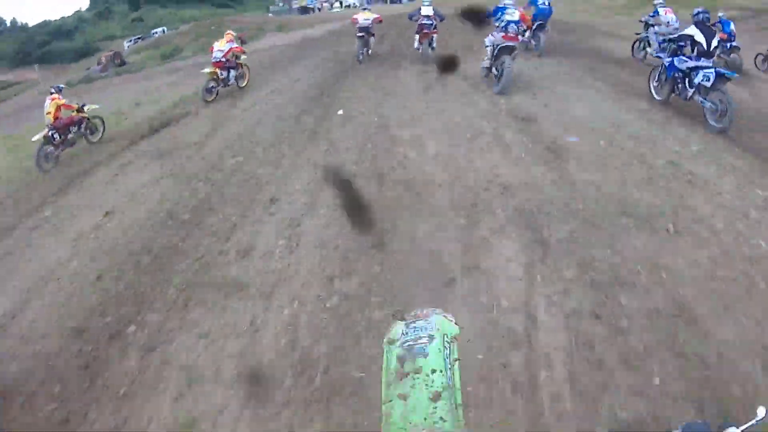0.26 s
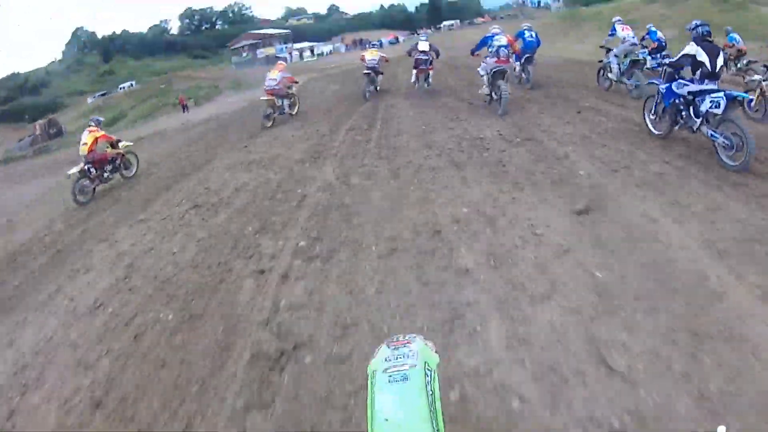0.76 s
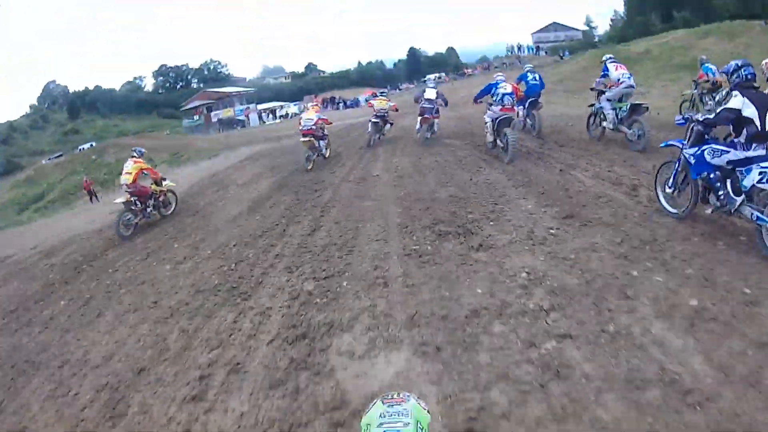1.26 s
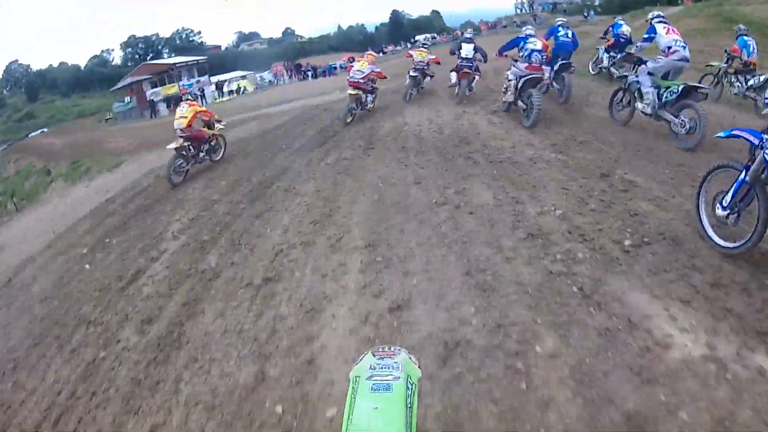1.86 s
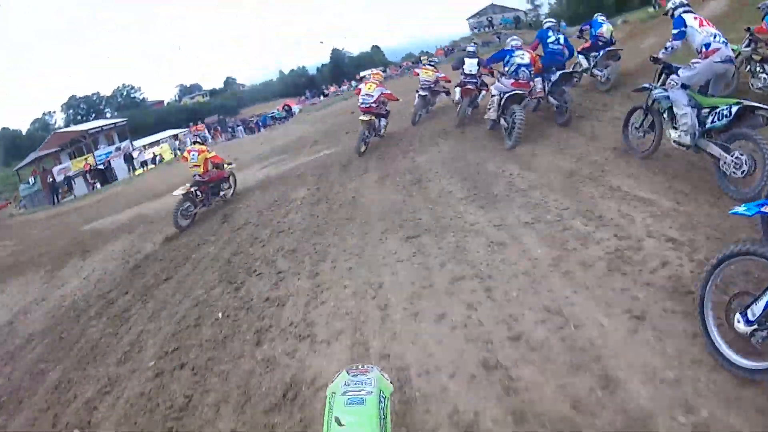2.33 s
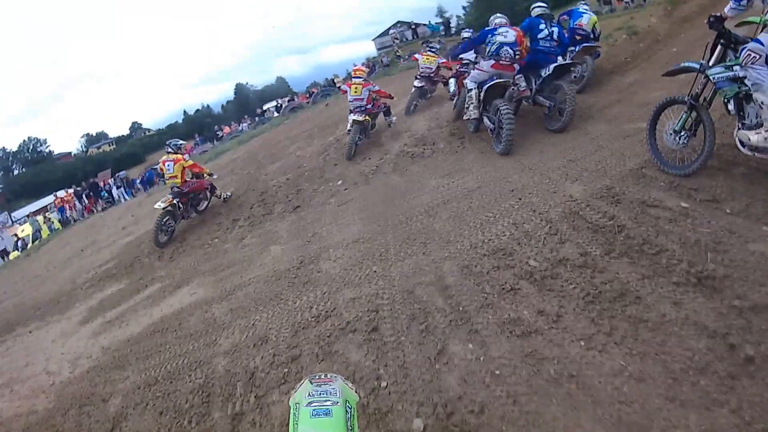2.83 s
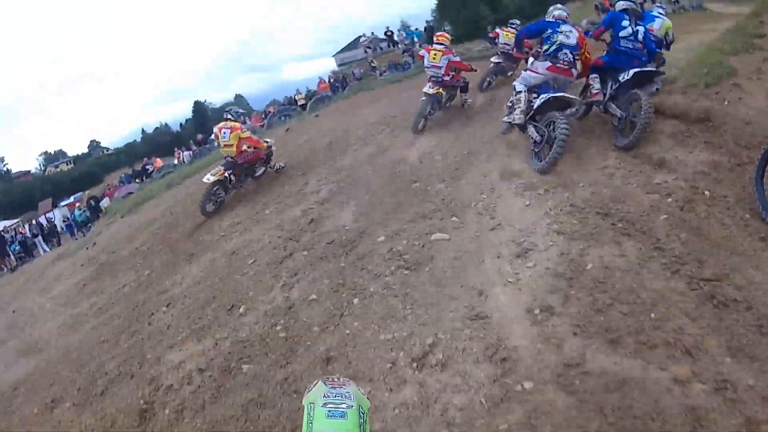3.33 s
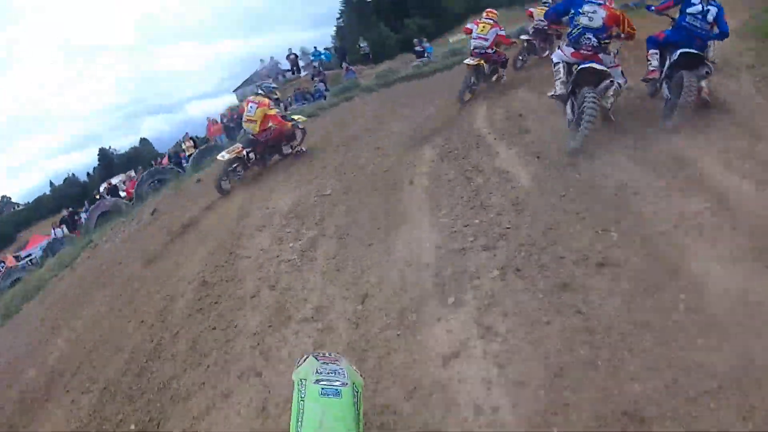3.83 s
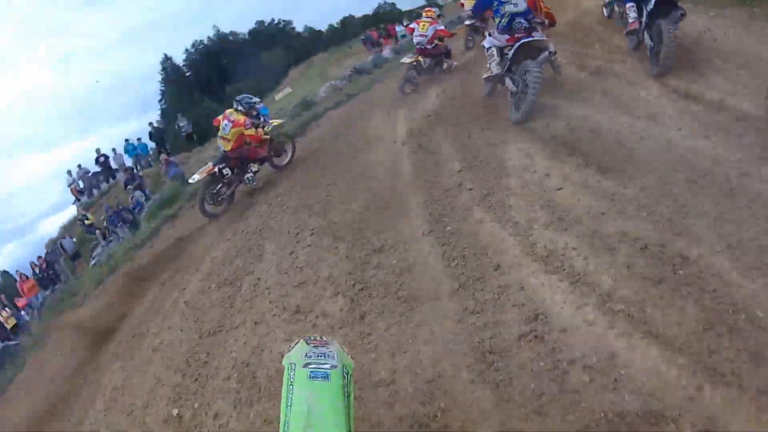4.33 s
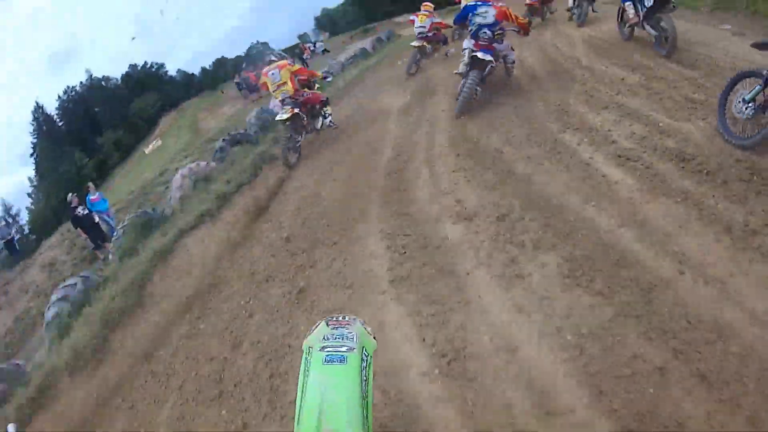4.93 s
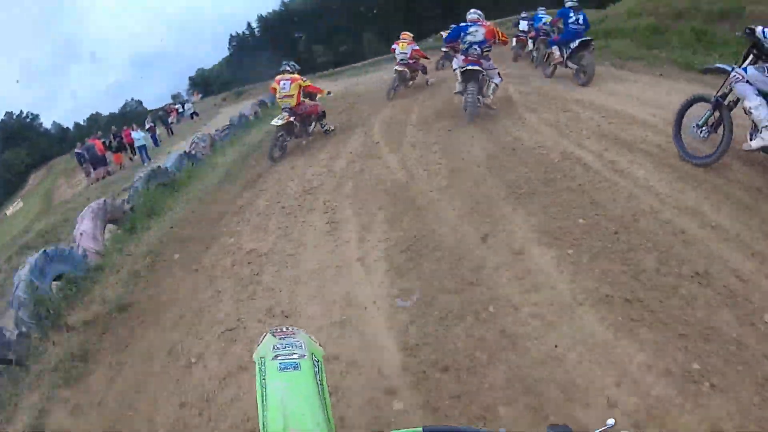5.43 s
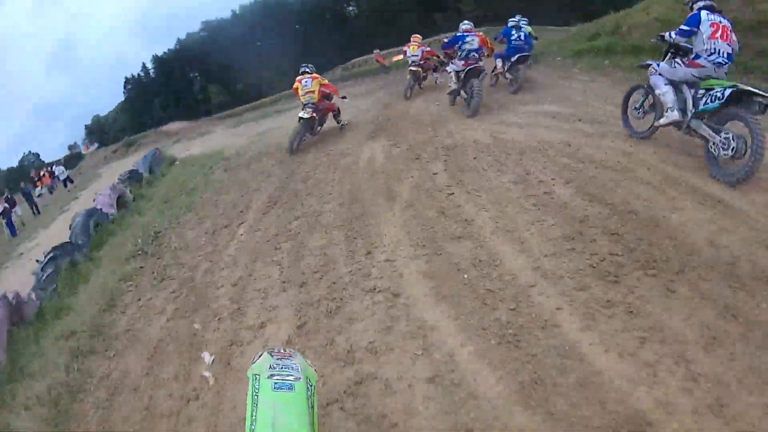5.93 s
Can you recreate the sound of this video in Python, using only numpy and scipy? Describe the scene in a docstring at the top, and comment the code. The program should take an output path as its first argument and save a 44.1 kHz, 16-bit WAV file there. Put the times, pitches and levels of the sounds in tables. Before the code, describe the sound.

A dirt bike engine barks briefly as a shower of dirt pelts the microphone's plastic case. A pack of bikes buzzes further ahead, with short revs and scattered sharp knocks from stones and chain. Nearby engines then rev louder through a corner, and the closest bike rasps back on the throttle amid pattering grit and hard clacks. Everything sounds boxy, nasal and slightly overloaded.

```python
"""Motocross corner from inside a camera case.

A pack of bikes brakes into a dirt corner and accelerates out, heard on one rider. Thrown dirt pelts the
case, stones and chain knock, rivals rev close by, and the rider's own engine barks out of the turn.
The plastic case passes mostly 1-3.5 kHz; loud moments overload the microphone."""
import sys
import numpy as np
from scipy import signal
from scipy.fft import rfft, irfft, next_fast_len
from scipy.io import wavfile
from scipy.ndimage import uniform_filter1d, minimum_filter1d

SR = 44100
rng = np.random.default_rng(int(sys.argv[2]) if len(sys.argv) > 2 else 0)


def wav_record(signal):
    """Record a signal, one row per channel, as 16-bit PCM in the file named by sys.argv[1]."""
    frames = np.transpose(np.atleast_2d(signal))
    bounded = np.clip(frames, -1, 1)
    # unit amplitude maps onto the largest positive 16-bit level
    quanta = np.round(bounded * 32767).astype(np.int16)
    wavfile.write(sys.argv[1], SR, quanta)


N = 272979
TIME = np.arange(N) / SR

# the field draws away on the straight, bunches up in the corner: time_s, level_db
PACK_LEVEL = [(0, -10), (.36, -16.5), (.45, -21.5), (.8, -25), (1.45, -27.5), (1.66, -25), (2.1, -25),
              (2.75, -28.5), (3.17, -24), (3.26, -21), (3.46, -21), (3.62, -17.5), (4.28, -15.5),
              (5.0, -13.5), (5.8, -17.5), (6.19, -20.5)]


def from_db(db):
    """Decibels to gain."""
    return 10 ** (np.asarray(db) / 20)


def unit_rms(x):
    """Scale to rms 1."""
    return x / np.sqrt(np.mean(x ** 2) + 1e-20)


def curves(rows, t=TIME):
    """Breakpoint columns interpolated at times t."""
    time_s, *columns = np.transpose(rows)
    return [np.interp(t, time_s, column) for column in columns]


def drift(rate_hz, size=N, hop=40):
    """Slow random wander, rms about 1."""
    pole = np.exp(-2 * np.pi * rate_hz * hop / SR)
    noise = rng.standard_normal(size // hop + 4000)
    slow = signal.lfilter([1], [1, -2 * pole, pole * pole], noise)[2000:]
    return np.interp(np.arange(size) / hop, np.arange(len(slow)), unit_rms(slow))


def swell(start_s, end_s, attack_s, release_s):
    """Rise to 1 by start_s, hold, decay after end_s."""
    rise = np.clip(1 + (TIME - start_s) / attack_s, 0, 1)
    return rise * np.exp(-np.clip((TIME - end_s) / release_s, 0, 20))


def window(start_s, end_s, fade_s=.032):
    """Sample mask of a burst and its gain, with fades outside the span."""
    inside_s = np.minimum(TIME - start_s, end_s - TIME)
    on = inside_s > -fade_s
    return on, np.clip(1 + inside_s[on] / fade_s, 0, 1)


def response(points, size=2048):
    """Minimum-phase impulse response from rows of freq_hz, gain_db."""
    fft_size = 2 * next_fast_len(N // 2 + 8192)
    bins_hz = np.maximum(np.arange(fft_size // 2 + 1) * SR / fft_size, 1)
    freq_hz, gain_db = np.transpose(points)
    magnitude = from_db(np.interp(np.log(bins_hz), np.log(freq_hz), gain_db))
    cepstrum = irfft(np.log(magnitude))
    cepstrum[0] /= 2
    return irfft(np.exp(2 * rfft(cepstrum[:size], fft_size)))[:size]


def through(x, impulse):
    """Filter by an impulse response."""
    return signal.oaconvolve(x, impulse)[:len(x)]


def resonance(x, hz, width_hz, gain_db):
    """Lift or cut a band with a two-pole resonator."""
    r = np.exp(-np.pi * width_hz / SR)
    ring = signal.lfilter([1, 0, -1], [1, -2 * r * np.cos(2 * np.pi * hz / SR), r * r], x + 1e-18)
    return x + (from_db(gain_db) - 1) * (1 - r * r) / 2 * ring


def camera_case():
    """Impulse response of the plastic case."""
    # wall transmission: freq_hz, gain_db
    wall = [(30, -25.5), (150, -31), (400, -19.5), (900, -18), (1050, -7.5), (1250, -1), (2100, 0.5),
            (2560, -10), (2900, 0.5), (3400, -4), (4000, -9), (5200, -26), (7000, -11.5), (16000, -46)]
    # panel modes: freq_hz, width_hz, gain_db
    modes = [(832, 85, 4.5), (1369, 100, 6), (1579, 73, 5.5), (1898, 284, 3.5), (2365, 74, 6.5),
             (2804, 270, 3), (3254, 46, 2), (4260, 24, -11), (4490, 82, 5.5), (4900, 31, -4),
             (5070, 56, 13.5), (5490, 59, 12.5)]
    impulse = response(wall)
    for freq_hz, width_hz, gain_db in modes:
        impulse = resonance(impulse, freq_hz, width_hz, gain_db)
    return impulse


def engine(firing_hz, rasp, uneven_db, wobble=.002, blow_s=.004, bark_hz=0, bark_s=.003, bark=0):
    """Firings of uneven strength: exhaust pulse, dying blow of gas noise, optional pipe ring (bark)."""
    size = len(firing_hz)
    cycles = rng.random() + np.cumsum(firing_hz * (1 + wobble * drift(24.4, size))) / SR
    nearest, last = np.round(cycles).astype(int), cycles.astype(int)
    age_s = cycles % 1 / firing_hz
    strength = from_db(uneven_db * rng.standard_normal(nearest[-1] + 2))
    pulses = np.sinc((cycles - nearest) * SR / firing_hz) * strength[nearest]
    blow = np.exp(-age_s / blow_s) * strength[last] * rng.standard_normal(size)
    ring = np.exp(-age_s / bark_s) * strength[last] * np.sin(2 * np.pi * bark_hz * age_s)
    return np.sqrt(1 - rasp) * unit_rms(pulses) + np.sqrt(rasp) * unit_rms(blow) + bark * unit_rms(ring)


def own_bike(case, attack_s=.042, climb_hz_per_s=380):
    """Slow, hard firings; the bark climbs while the throttle is held."""
    # revs sag under load, flare as the rear wheel slips: time_s, firing_hz
    revs = [(4.9, 70.5), (5.42, 66.6), (5.56, 77.3), (5.74, 69.4), (5.86, 68)]
    # throttle openings: start_s, end_s, level_db
    throttle = [(0, 0.32, -11), (4.34, 4.753, -19), (4.9, 5.833, -12)]
    firing_hz, = curves(revs)
    gain, held_s = np.zeros(N), np.zeros(N)
    for start_s, end_s, level_db in throttle:
        gain += from_db(level_db) * swell(start_s, end_s, attack_s, release_s=.014)
        held_s = np.where(TIME > start_s - attack_s, np.clip(TIME, start_s, end_s) - start_s, held_s)
    bark_hz = 1585 + climb_hz_per_s * held_s
    exhaust = engine(firing_hz, rasp=.55, uneven_db=2, wobble=.001,
                     bark_hz=bark_hz, bark_s=.0011, bark=.65)
    ground_echo = .13 * np.interp(TIME - .0037, TIME, exhaust)
    return gain * unit_rms(through(exhaust + ground_echo, case))


def pack(case, scatter_s=.012, size=2048):
    """Far engines rev independently; ground and banks scatter their firings into a smooth buzz."""
    # mean rate of each engine: firing_hz
    engines_hz = [78.46, 92.84, 117.74, 134.65, 143.46, 156.26, 171.6]
    out = np.zeros(N)
    for firing_hz in engines_hz:
        revs = drift(.5)
        buzz = engine(firing_hz * np.exp(.07 * revs), rasp=.15, uneven_db=1.6)
        echoes = rfft(rng.standard_normal(size) * np.exp(-TIME[:size] / scatter_s))
        scatter = irfft(echoes / np.abs(echoes))   # flat spectrum, smeared in time
        out += through(buzz, scatter) * from_db(revs + 2 * drift(1.56))
    return from_db(curves(PACK_LEVEL)[0]) * unit_rms(through(out, case))


def struck_panel(case, ring_hz, width_hz, ring_db):
    """Case response to a blow that favours one panel; unit energy."""
    body = resonance(case, ring_hz, width_hz, ring_db)
    return body / np.linalg.norm(body)


def clods(case, panels_hz=(1380, 1650, 2000, 3200), crumble_s=.0041, size=1024):
    """Clods land at random on the case panels and crumble within milliseconds."""
    # showers from the bikes ahead: start_s, end_s, hits_per_s, size_db
    showers = [(0, 0.099, 380, -3.5), (0.125, 0.224, 460, -4), (0.271, 0.363, 300, -7),
               (4.398, 5.804, 55, -15.5)]
    rate_per_s, weight = 55, from_db(-32)   # stray clods throughout
    for start_s, end_s, hits_per_s, size_db in showers:
        shower = swell(start_s, end_s, attack_s=.057, release_s=.012)
        rate_per_s += hits_per_s * shower
        weight += from_db(size_db) * shower
    out = np.zeros(N)
    for panel_hz in panels_hz:
        lands = rng.random(N) < rate_per_s / len(panels_hz) / SR
        hits = lands * weight * from_db(5.45 * rng.standard_normal(N))
        crumbs = through(hits, np.exp(-TIME[:size] / crumble_s)) * rng.standard_normal(N)
        out += through(crumbs, struck_panel(case, panel_hz, width_hz=124, ring_db=10))
    return out


def spray(grains_per_s=5000, band_hz=(6500, 12500)):
    """Fine dirt off the tyres patters on the case as a thin hiss."""
    # gusts of dirt: start_s, end_s, level_db
    gusts = [(0, 0.333, -13.5), (.4, .45, -42), (.68, .71, -41), (1.64, 1.68, -49), (2.058, 2.18, -43),
             (3.22, 3.42, -40), (3.62, 3.72, -40), (4.566, 5.08, -32), (5.216, 5.62, -42),
             (5.72, 6.086, -35.5)]
    grains = (rng.random(N) < grains_per_s / SR) * rng.standard_normal(N)
    hiss = signal.sosfilt(signal.butter(2, band_hz, "band", fs=SR, output="sos"), grains)
    gust_gain = sum(from_db(level_db) * swell(start_s, end_s, attack_s=.075, release_s=.03)
                    for start_s, end_s, level_db in gusts)
    dust_gain = from_db(curves(PACK_LEVEL)[0] - 27.5)   # thin dust trails the field
    return np.hypot(gust_gain, dust_gain) * from_db(1.8 * drift(13)) * unit_rms(hiss)


def knocks(case, thump_hz=450, thump_s=.004, tick_hz=5000, tick_s=.003, size=4096):
    """Each knock: a crack that rings the case, a dull thump through the mount, a bright tick."""
    # stones, chain, suspension: start_s, level_db, ring_hz, decay_s, thump_db
    blows = [(.422, 3.5, 2520, 0.0015, -32), (.64, -5.5, 2280, 0.0019, -60),
             (1.147, -11.5, 640, 0.0087, -28), (1.85, 1, 1910, 0.0038, -52),
             (2.217, 7.5, 2410, 0.0015, -25), (2.582, -16.5, 1600, .006, -60),
             (2.88, -16.5, 1760, .006, -60), (3.472, -11.5, 1420, 0.013, -60),
             (4.01, -1.5, 1630, 0.0031, -27), (4.171, -3, 1600, 0.0028, -29),
             (4.312, -2.5, 1870, 0.0051, -51), (4.424, 1, 1430, 0.012, -20), (4.83, -6, 2080, 0.0043, -45),
             (5.695, 2.5, 2210, 0.0043, -36), (5.739, 8, 1980, 0.0067, -43)]
    out, t = np.zeros(N + size), TIME[:size]
    for start_s, level_db, ring_hz, decay_s, thump_db in blows + rebounds():
        tick_db = -30 + 2.9 * level_db   # harder knocks are brighter
        grit, shake = rng.standard_normal((2, size))
        panel = struck_panel(case, ring_hz, width_hz=310, ring_db=10.5)
        crack = through(grit * np.exp(-t / decay_s), panel)
        thump = unit_rms(signal.lfilter(*signal.butter(1, thump_hz, fs=SR), shake)) * np.exp(-t / thump_s)
        tick = signal.lfilter(*signal.butter(2, tick_hz, "high", fs=SR), shake) * np.exp(-t / tick_s)
        at = round(start_s * SR)
        out[at:at + size] += from_db(level_db) * crack + from_db(thump_db) * thump + from_db(tick_db) * tick
    return out[:N]


def exhaust_pipe(x, hz=2000, pole=.787, stages=6):
    """A long pipe delays the mids and stretches each pulse: an all-pass chain."""
    poles = [1, -2 * pole * np.cos(2 * np.pi * hz / SR), pole ** 2]
    return signal.sosfilt([poles[::-1] + poles] * stages, x)


def rival_exhaust(case, firing_hz, ring_hz, ring_db, octave_db, width_hz=170):
    """A near engine through a tuned pipe ringing at ring_hz and its octave; rms 1."""
    buzz = exhaust_pipe(engine(firing_hz, rasp=.1, uneven_db=1.2, blow_s=.003))
    buzz = resonance(buzz, ring_hz, width_hz, ring_db)
    buzz = resonance(buzz, 2 * ring_hz, 2 * width_hz, octave_db)
    return unit_rms(through(buzz, case))


def rivals(case):
    """Near bikes stand out while their throttle is open; revs glide along an arch."""
    # throttle bursts: start_s, end_s, first_firing_hz, last_firing_hz, flare_hz, level_db, ring_hz, ring_db
    bursts = [(.45, 1.05, 126, 101, 11, -30.5, 1900, 5), (1.34, 1.547, 99, 94, 0, -36, 1580, 9),
              (2.1, 2.19, 129, 125.3, 0, -20.5, 1380, 5), (2.261, 2.577, 116, 81, -0.5, -34.5, 1940, 7),
              (2.651, 3.078, 79.3, 85, 0, -36.5, 1500, -5), (3.238, 3.436, 120, 125, 2.5, -26, 1360, 5.5),
              (3.57, 3.735, 146, 150.5, 0, -12.5, 1445, 13), (3.9, 4.215, 127, 135, 3, -19.5, 1303, 11.5),
              (5.859, 6.187, 148, 132, 0, -21.5, 1500, 8)]
    out = np.zeros(N)
    for start_s, end_s, first_hz, last_hz, flare_hz, level_db, ring_hz, ring_db in bursts:
        on, fade = window(start_s, end_s)
        progress = np.clip((TIME[on] - start_s) / (end_s - start_s), 0, 1)
        firing_hz = first_hz + (last_hz - first_hz) * progress + flare_hz * np.sin(np.pi * progress)
        exhaust = rival_exhaust(case, firing_hz, ring_hz, ring_db, octave_db=ring_db)
        out[on] += from_db(level_db) * fade * exhaust
    return out


def rebounds(count=3, gap_s=.0205, loss_db=3):
    """Knock rows for a loose part bouncing on after a bump."""
    # first bounce: start_s, level_db, ring_hz, decay_s, thump_db
    first_bounce = (1.171, -12.5, 1650, .005, -55)
    start_s, level_db, *timbre = first_bounce
    return [(start_s + gap_s * k, level_db - loss_db * k, *timbre) for k in range(count)]


def closest_rival(case):
    """The nearest bike through the corner, revs wavering over the ruts."""
    # its engine: time_s, firing_hz, level_db
    run = [(4.34, 158, -19), (4.45, 161, -19), (4.51, 170, -19), (4.555, 162, -16.5), (4.601, 174, -7),
           (4.7, 157.5, -15.5), (4.77, 168, -22), (4.86, 163, -21.5), (4.91, 167, -18.5), (5.0, 159, -15),
           (5.06, 170, -20)]
    on, fade = window(run[0][0], run[-1][0])
    firing_hz, level_db = curves(run, TIME[on])
    exhaust = rival_exhaust(case, firing_hz, ring_hz=1280, ring_db=16, octave_db=3)
    out = np.zeros(N)
    out[on] = from_db(level_db) * fade * exhaust
    return out


def saturate(x, overload=.62):
    """Clean at moderate levels, flat above overload."""
    return x / (1 + (x / overload) ** 4) ** .25


def limiter(x, ceiling=.7, size=64):
    """Gain ducks for a millisecond or two around peaks over the ceiling."""
    gain = ceiling / np.maximum(np.abs(x), ceiling)
    return x * uniform_filter1d(minimum_filter1d(gain, size), size)


def scene():
    """Engines, dirt and knocks inside the case; mono."""
    case = camera_case()
    engines = own_bike(case) + rivals(case) + closest_rival(case) + pack(case)
    return (engines + clods(case) + spray() + knocks(case))[None]


def record(dry, bias=.018, cutoff_hz=15850):
    """The microphone overloads unevenly, its port dulls the treble, peaks are limited, the top is cut."""
    # covered microphone port: freq_hz, gain_db
    port = [(40, 1.5), (1500, -1), (3200, -0.5), (4200, -9), (5300, -17.5), (6000, -32), (6800, -29),
            (7400, -35), (8000, -45), (8900, -25), (11000, -15.5), (13000, -22), (16000, -15.5)]
    squashed = saturate(dry[0] + bias) - saturate(bias)
    dulled = through(squashed, response(port))
    dc_free = signal.sosfilt(signal.butter(1, 20, "high", fs=SR, output="sos"), dulled)
    lowpass = signal.ellip(10, .1, 80, cutoff_hz, fs=SR, output="sos")
    return signal.sosfilt(lowpass, limiter(dc_free))[None]


dry = scene()
out = record(dry)
wav_record(out)
```